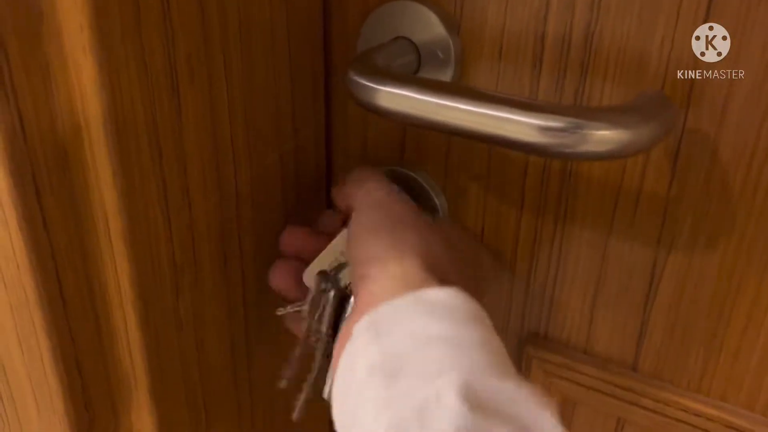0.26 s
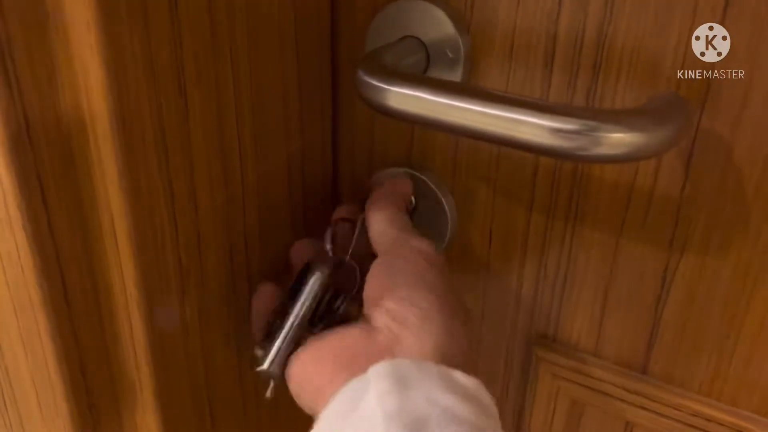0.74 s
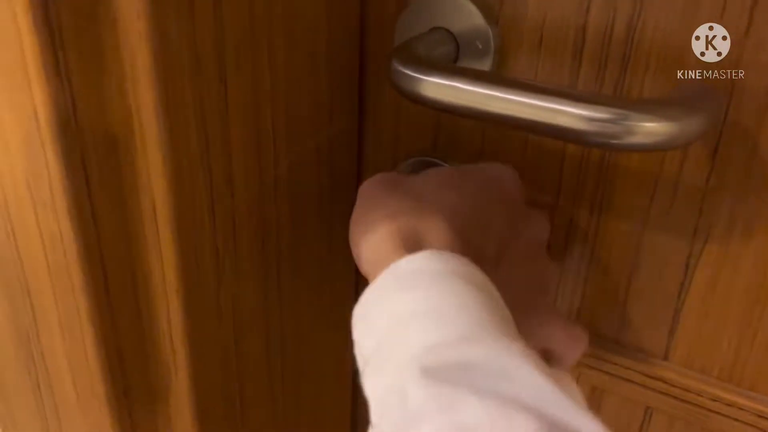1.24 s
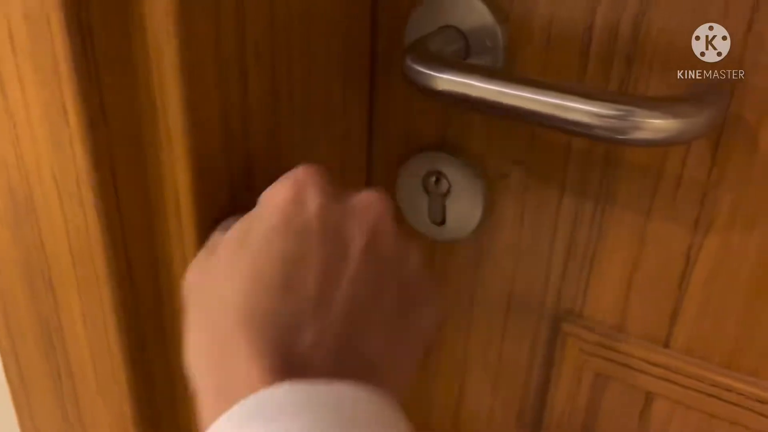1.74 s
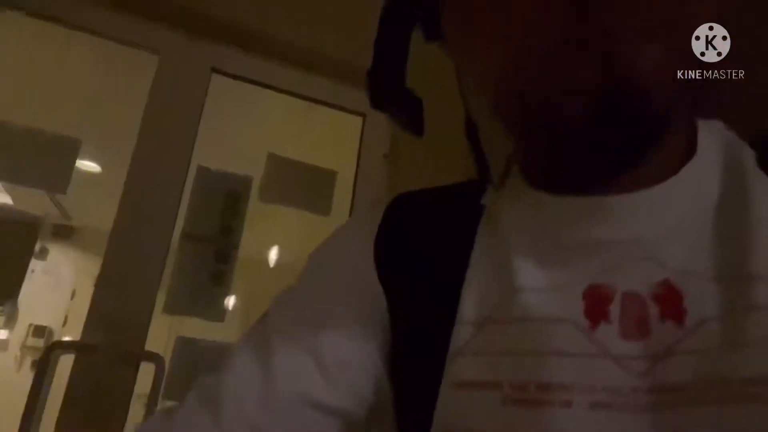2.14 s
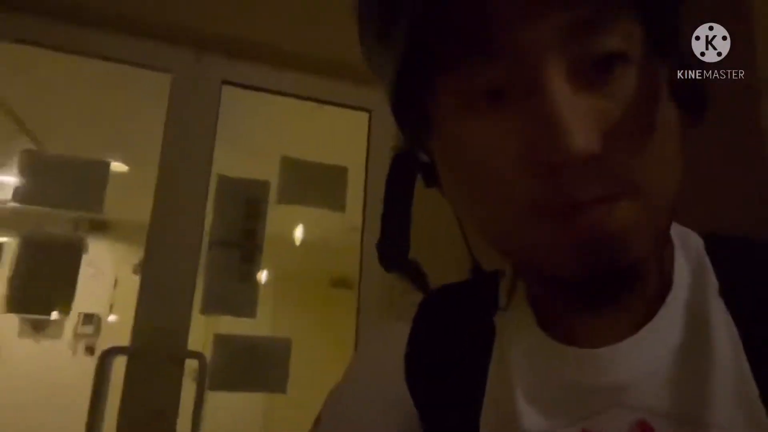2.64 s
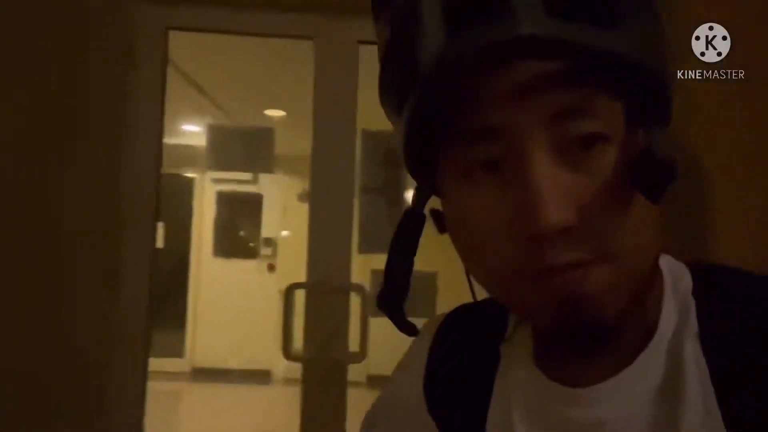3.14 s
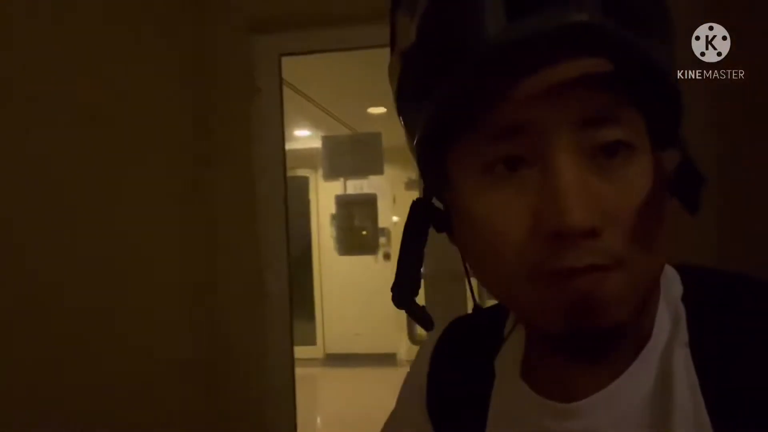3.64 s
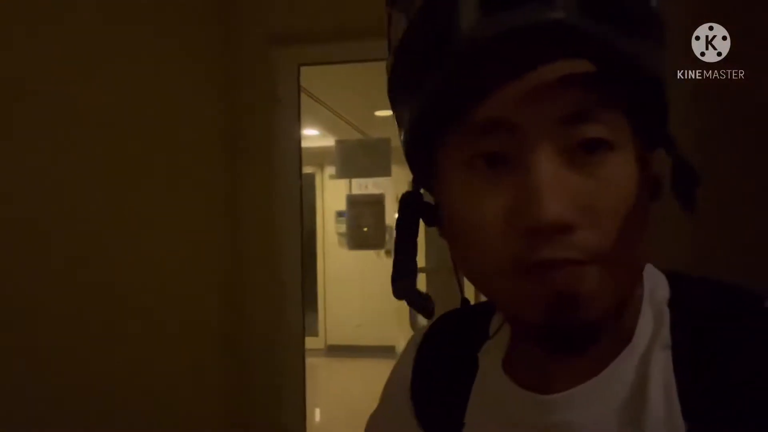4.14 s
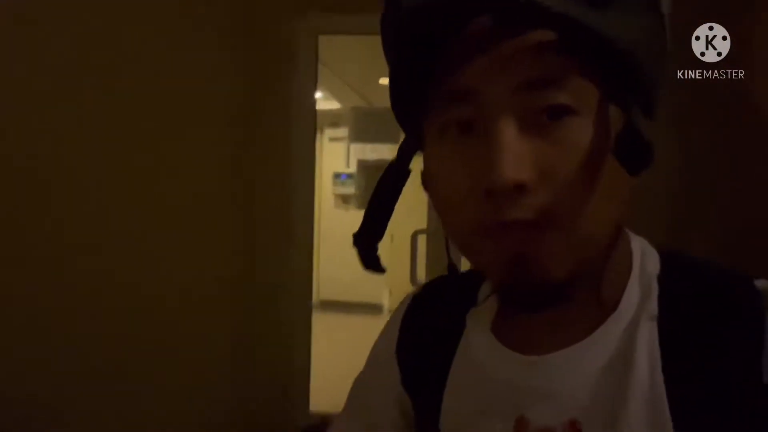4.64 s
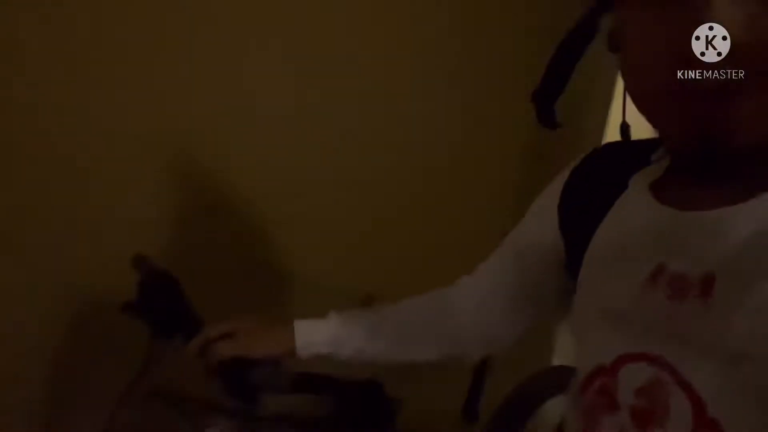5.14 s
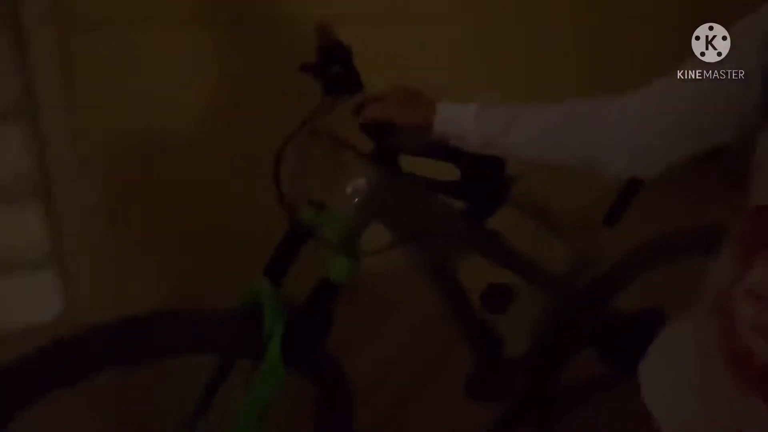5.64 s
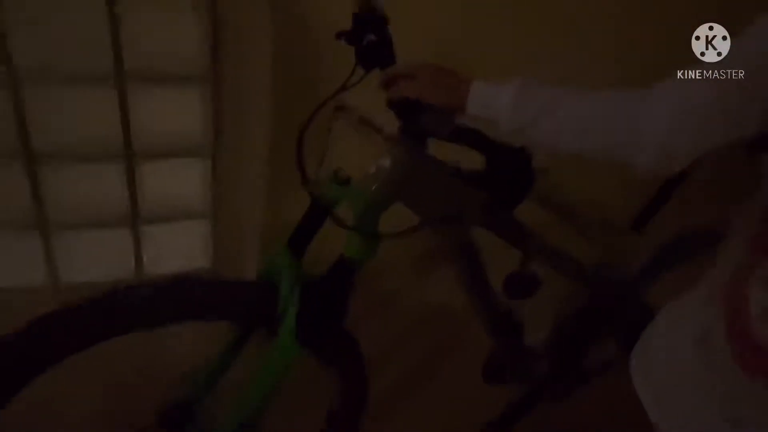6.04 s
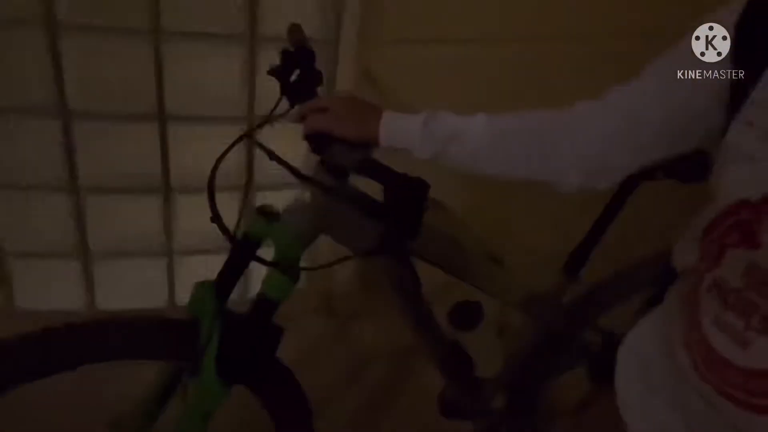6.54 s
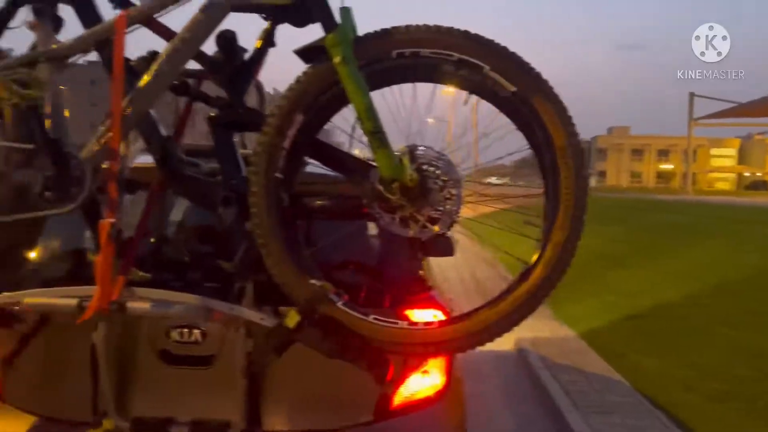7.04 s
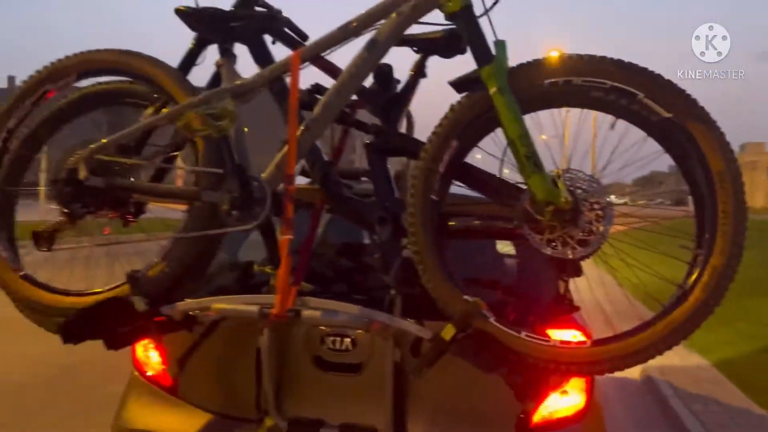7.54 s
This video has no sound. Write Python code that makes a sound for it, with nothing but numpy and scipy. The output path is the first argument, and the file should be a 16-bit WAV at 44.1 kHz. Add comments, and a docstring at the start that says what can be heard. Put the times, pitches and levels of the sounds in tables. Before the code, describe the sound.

Close by in a hard, echoing corridor, a bunch of keys jangles and scrapes while a lock snaps and clunks hard in a wooden door, which bumps and booms. After two seconds it fades into a humming lobby where a bicycle freewheel ticks slowly, then faster, with one soft frame bump. Finally, outdoors, a rack knocks in a quick burst beside a steady low car engine.

```python
"""A bunch of keys jangles as a lock is turned in an echoing corridor: noise snaps, bouncing grit and ringing tones.
The wooden door knocks, bumps and booms around them.
Next, a bicycle is wheeled through a humming lobby; its freewheel, three pawls a tooth, ticks mostly faster.
Last, outdoors, a car engine rumbles as sines locked to its crankshaft over noise, and a bicycle rack on the car
knocks in one quick burst. The three places follow each other with fades."""
import sys
import numpy as np
from scipy import signal
from scipy.fft import rfft, irfft, next_fast_len
from scipy.io import wavfile
from scipy.ndimage import uniform_filter1d, map_coordinates

SR = 44100
rng = np.random.default_rng(int(sys.argv[2]) if len(sys.argv) > 2 else 0)


def waveform_to_disk(signal):
    """Save audio, clipped to [-1, 1], as 16-bit WAV at the path in sys.argv[1]."""
    frames = np.transpose(np.atleast_2d(signal))
    scaled = np.clip(frames, -1, 1) * 32767
    samples = np.round(scaled).astype(np.int16)
    wavfile.write(sys.argv[1], SR, samples)


N = 343538
TIME = np.arange(N) / SR
EDGE_HZ = 16100  # top of the audible band here

# when the lobby is heard: (fade-in start [s], fade-in end [s], fade-out start [s], fade-out end [s])
LOBBY_TIMES = (2.11, 2.3, 6.72, 6.795)
# how alike noise is on the left and right: (frequency [Hz], coherence [0-1])
LIKENESS = [(30, 0.012), (70, 1), (130, 0.88), (260, 0.76), (520, 0.13), (1000, 0.16), (16000, 0.18)]
# tone colour of key metal striking and scraping: (frequency [Hz], relative level [dB])
KEY_METAL = [(500, -13.5), (1500, -14.5), (2600, -10.5), (4500, -3.5), (6500, -1.5), (8200, 0.5),
             (9400, -3), (10800, 3.5), (12500, -1), (14000, 3), (15500, 3.5), (16500, 5.5)]


def amp(db):
    """Turns decibels into a plain multiplier."""
    return 10 ** (np.asarray(db) / 20)


def unit(x):
    """Scales a sound to an average strength (rms) of 1."""
    return x / np.sqrt(np.mean(x ** 2) + 1e-20)


def read(points, hz):
    """Reads a table between its points, with frequency on a logarithmic scale."""
    f, value = np.transpose(points)
    return np.interp(np.log(hz + 1), np.log(f + 1), value)


def add(mix, s, sound):
    """Adds a sound to the mix, starting at s seconds."""
    part = mix[:, max(0, round(s * SR)):][:, :sound.shape[1]]
    part += sound[:, :part.shape[1]]


def dying(t, t60):
    """Exponential decay that falls by 60 dB in t60 seconds."""
    return np.exp(-np.log(1000) * t / t60)


def peak_unit(x, size=176):
    """Scales a hit so that its loudest 4 ms have rms 1."""
    return x / np.sqrt(uniform_filter1d((x ** 2).mean(0), size).max() + 1e-20)


def colour(x, gain_db, size=2048):
    """Filters without sounding ahead of time (minimum phase); gain_db(hz) gives the gain."""
    hz = abs(np.fft.fftfreq(size, 1 / SR))
    log_gain = np.log(amp(np.maximum(gain_db(hz), -100)))
    taps = np.fft.ifft(np.exp(np.conj(signal.hilbert(log_gain)))).real
    return signal.oaconvolve(x, taps[None], axes=1)[:, :x.shape[1]]


def spotty(hz, spot_db):
    """Chance gains in dB, spread evenly over frequency: no two spots on a surface sound the same."""
    return np.interp(hz, np.linspace(0, SR / 2, len(spot_db)), spot_db)


def pair(n):
    """White noise on the left and right: mostly alike around 70 to 260 Hz, mostly unrelated in the treble."""
    a, b = rfft(rng.standard_normal((2, n)))
    same = np.clip(read(LIKENESS, np.fft.rfftfreq(n, 1 / SR)), -1, 1)
    return irfft(np.array([a, same * a + np.sqrt(1 - same ** 2) * b]), n)


def wash(spectrum):
    """Steady noise from all around, shaped by a spectrum, of rms 1."""
    n = next_fast_len(N, True)
    gain = amp(read(spectrum, np.fft.rfftfreq(n, 1 / SR)))
    return unit(irfft(rfft(pair(n)) * gain, n)[:, :N])


def drift(count):
    """Smooth chance curve of rms 1, made from count random values over the whole duration."""
    curve = signal.resample(rng.standard_normal(count), count * 8)
    return unit(np.interp(TIME, np.linspace(0, TIME[-1], count * 8), curve))


def room(x, t60s, build_s, size=44100, ripple_db=0, count=700):
    """Echo tail that builds up, each band dying at its own speed; hard walls favour some pitches."""
    favoured = rng.standard_normal(count).clip(-2, 2)
    favoured = np.interp(np.linspace(0, count - 1, size // 2 + 1), np.arange(count), favoured)
    noise = irfft(rfft(pair(size)) * amp(ripple_db * favoured), size)
    hz, t, z = signal.stft(noise, SR, nperseg=256)
    tail = signal.istft(z * amp(-60 * t / read(t60s, hz)[:, None]), SR, nperseg=256)[1]
    tail = tail * (1 - np.exp(-np.arange(tail.shape[1]) / SR / build_s))
    return signal.fftconvolve(x, tail / np.linalg.norm(tail[0]), axes=1)[:, :N]


def roaming(x, depth_db, width_hz, last_s):
    """Room resonances come and go in a steady noise as the microphone moves among them."""
    even_out_hz = 2300  # higher up the resonances overlap and even out
    hz, t, z = signal.stft(x, SR, nperseg=4096)
    place = np.meshgrid(hz / width_hz, t / last_s, indexing="ij")
    patches = map_coordinates(rng.standard_normal(size=(256, 128)), place, order=1, mode="wrap")
    gain = amp(depth_db * unit(patches) / (1 + hz[:, None] / even_out_hz))
    return unit(signal.istft(z * gain, SR, nperseg=4096)[1][:, :N])


def knocks(rows, spectrum, modes, ring_db, crack_db=-10, crack_t60=.005, detune=0, grainy=0):
    """A blow is a crack and a short rattle in a body whose tones ring on; loose parts can shift their pitch."""
    out, t = np.zeros((2, N)), np.arange(SR * 2 // 3) / SR
    contact_samples = 32  # how long each grain of the rattle lasts
    mode_hz, mode_db, mode_t60 = np.transpose(modes)
    decays = amp(-60 * t / mode_t60[:, None])
    for s, db, t60, tilt_db in rows:
        def tilt(hz):
            return tilt_db * np.log2(np.maximum(hz, 130) / 1000)

        grains = np.repeat(rng.standard_normal(len(t)), contact_samples)[:len(t)]
        contacts = np.exp(grainy * grains.clip(-2, 2))
        force = contacts * dying(t, t60) + amp(crack_db) * dying(t, crack_t60)
        blow = peak_unit(colour(pair(len(t)) * force, lambda hz: read(spectrum, hz) + tilt(hz)))

        tuned_hz = mode_hz * (1 + detune * rng.standard_normal(len(modes)))
        swings = decays * np.exp(2j * np.pi * tuned_hz[:, None] * t)
        # tones that are less alike on the two sides start further out of step
        phase = rng.random(len(modes)) + rng.random((2, len(modes))) * (1 - read(LIKENESS, mode_hz)) / 2
        strengths = amp(mode_db + tilt(mode_hz)) * np.exp(2j * np.pi * phase)
        ring = peak_unit((strengths @ swings).imag)
        add(out, s, amp(db) * (blow + amp(ring_db) * ring))
    return out


def standing_wave():
    """Change of the lobby's low hum, in dB, along the microphone's way through its standing waves."""
    # swing of the hum before each sound takes its share: (time [s], level [dB])
    swing = [(2.3, 2), (2.85, -2.5), (3.15, -12.5), (3.8, -23.5), (5.7, -15), (6.2, -10), (6.7, -0.5)]
    return np.interp(TIME, *np.transpose(swing))


def ventilation_rumble():
    """Low ventilation noise, gently changed by the standing wave and by passing resonances."""
    # tone colour of the rumble: (frequency [Hz], relative level [dB])
    bass = [(13, -46), (22, -33), (40, -0.5), (60, 0.5), (114, -6.5), (125, -12.5), (136, -44),
            (161, -11.5), (194, -17), (217, -22.5), (233, -13.5), (250, -34), (320, -54), (550, -120)]
    level = amp(-37 + 0.19 * standing_wave())
    return level * roaming(wash(bass), depth_db=1.5, width_hz=21.84, last_s=.13)


def ventilation_rush():
    """Airy ventilation noise whose resonances come and go."""
    # tone colour of the rush: (frequency [Hz], relative level [dB])
    air = [(130, -0.5), (220, -1), (330, -3.5), (430, -2), (620, 0), (950, -10), (1400, -12.5), (2600, -14),
           (3600, -23), (6000, -27), (10000, -33), (16000, -35.5)]
    return amp(-45) * roaming(wash(air), depth_db=3, width_hz=45, last_s=.25)


def hum(waver=0.28, wander=0.11):
    """Fan tones swell and sink as the microphone moves through their standing waves."""
    # fan tones: (frequency [Hz], level before the swing [dB], share of the standing-wave swing [0-1])
    tones = [(59.3, -36, 0.58), (107.6, -46.5, 0.2), (211.7, -58, 0.03), (229, -59.5, 0.21),
             (425, -63.5, 0), (607, -67, 0), (614, -62.5, 0.05)]
    place_db, out = standing_wave(), 0
    for hz, db, share in tones:
        level = np.sqrt(2) * amp(db + share * place_db) * (1 + waver * drift(count=30))
        out = out + level * np.sin(2 * np.pi * (hz * TIME + wander * drift(count=40)))
    return out


def road_noise():
    """Steady outdoor road noise."""
    # tone colour of the street: (frequency [Hz], relative level [dB])
    road = [(70, -18.5), (140, -7.5), (210, -8), (330, -14), (470, -17), (620, -19.5), (920, -16.5),
            (1400, -25.5), (2000, -29.5), (4000, -33), (8000, -44), (12000, -46), (16000, -68.5)]
    return amp(-46) * wash(road)


def engine(uneven=0.11, jitter_turns=0.005):
    """A four-cylinder engine fires twice a turn, a little unevenly, over noisy exhaust flutter."""
    # engine speed and loudness: (time [s], crankshaft frequency [Hz], level [dB])
    running = [(7.0, 29.8, -25.5), (7.058, 29.77, -25), (7.7, 29.53, -27), (7.78, 31.6, -30)]
    # strength of 1 to 5 times the crankshaft frequency: (relative level [dB])
    orders_db = [-20, 2, -10.5, -17, -23.5]
    # tone colour of the exhaust: (frequency [Hz], relative level [dB])
    exhaust = [(20, -13), (35, 1), (80, 10), (115, 3), (170, -11.5), (300, -42.5)]
    s, hz, db = np.transpose(running)
    turns = np.cumsum(np.interp(TIME, s, hz)) / SR + jitter_turns * drift(count=300)
    tone = sum(amp(order_db) * np.sin(2 * np.pi * (k * turns + rng.random()))
               for k, order_db in enumerate(orders_db, 1))
    firing = amp(np.interp(TIME, s, db)) * unit(tone) * (1 + uneven * drift(count=400))
    return firing + amp(-41) * wash(exhaust)


def rack_knocks():
    """The bicycle rack on the car knocks in a burst of blows, its loose parts shifting pitch each time."""
    # blows: (time [s], level of the blow [dB], t60 [s], treble tilt [dB per octave])
    blows = [(6.99, -41.5, 0.1, 6), (7.032, -31.5, 0.05, 6), (7.039, -31.5, 0.038, 1),
             (7.045, -36, 0.11, -1.5), (7.055, -35, .06, -3), (7.069, -38, .05, -4.5),
             (7.081, -44, 0.042, -3.5), (7.095, -42.5, .03, -1.5)]
    # tone colour of a blow: (frequency [Hz], relative level [dB])
    body = [(100, -46), (200, -9), (520, -4), (750, 0.5), (930, 1), (1180, 3), (1420, -2.5), (1650, -4.5),
            (1950, -9), (2400, -7.5), (3000, -15), (4500, -17), (9000, -31), (15000, -37.5)]
    # ringing tones before detuning and tilt: (frequency [Hz], relative level [dB], t60 [s])
    modes = [(420, -4.5, 0.1), (767, -5.5, .11), (1150, 1.5, 0.11), (1200, -2, 0.13), (1307, -3, .1),
             (1620, -7, 0.11), (2200, -2, 0.044), (2480, -3.5, .03)]
    return knocks(blows, body, modes, ring_db=-3.5, crack_db=-3, detune=0.014, grainy=.2)


def street():
    """Engine, road noise and knocking rack outdoors."""
    return engine() + road_noise() + rack_knocks()


def bumps():
    """The bicycle frame bumps as it is steered."""
    # bumps: (time [s], level of the blow [dB], t60 [s], treble tilt [dB per octave])
    blows = [(6.44, -30.5, 0.066, 0)]
    # tone colour of the frame: (frequency [Hz], relative level [dB])
    frame = [(100, -8), (200, -4), (360, -10), (500, -19), (2000, -29.5), (12000, -58)]
    # ringing tones of the frame: (frequency [Hz], relative level [dB], t60 [s])
    modes = [(226, -4, .07), (327, 5, 0.064)]
    return knocks(blows, frame, modes, ring_db=-8.0)


def teeth():
    """One tick for each tooth that the wheel brings past: rows (time s, level dB, time to next tooth s)."""
    # freewheel speed as the bicycle is pushed: (time [s], speed [teeth per s])
    wheel_speed = [(2.293, 1.365), (2.559, 2.045), (3.004, 4.711), (3.462, 6.357), (4.373, 7.628),
                   (4.74, 10.63), (5.246, 10.051), (5.617, 10.417), (6.064, 13.919), (6.319, 13.562),
                   (6.72, 10.712)]
    s, speed = np.transpose(wheel_speed)
    t = np.arange(s[0], LOBBY_TIMES[-1], 1 / SR)
    passed = np.cumsum(np.interp(t, s, speed)) / SR
    starts = np.interp(np.arange(int(passed[-1]) + 1), passed, t)
    # from 5.3 s the hub moves away, losing 2.86 dB per second
    level_db = -29 - 2.86 * np.maximum(starts - 5.3, 0)
    return zip(starts, level_db, np.gradient(starts))


def freewheel(stagger=.022, slack=.3, patchy_db=2.0, broad_db=1.4, spiky=1.0, count=50):
    """Three pawls drop just after each other, closer at speed; floor and walls scatter each tick anew."""
    # tone colour of the hub: (frequency [Hz], relative level [dB])
    hub_metal = [(1000, -15), (2000, -16.5), (2650, -5.5), (3300, -12.5), (4200, -11), (4950, -6.5),
                 (5400, -10.5), (6000, -8.5), (6650, 0), (7600, -2), (8650, 3.5), (9800, -2.5), (11200, -5),
                 (14200, 4), (15500, -0.5), (16300, -11.5)]
    # decay of the lobby echo: (frequency [Hz], t60 [s])
    echo_t60 = [(1000, 0.35), (4000, 0.43), (8000, 0.36), (12000, 0.29), (16000, 0.16)]
    # how squarely the hub faces the microphone, which bares its snap: (time [s], level [dB])
    facing = [(2.3, -0.5), (3.2, -3), (3.7, 0), (4.5, -1.5), (5.0, -2.5), (6.7, 3.5)]
    # lift of the rim's resonance as the wheel turns away: (time [s], level [dB])
    rim_lift = [(2.3, 3.5), (3.2, 8), (4.6, 4), (4.8, -3.5), (6.7, 0)]
    # pawls in the order they drop: (relative level [dB])
    pawls_db = [-4.5, -1, -0.5]
    rim_middle_hz, rim_width_hz, rim_wander = 3130, 470, .075  # the rim rings under each tick
    dulling_db_per_s = 0.65  # loss at the top of the band as the hub turns aside
    out, t = np.zeros((2, N)), np.arange(SR // 6) / SR
    for s, db, period in teeth():
        facing_db = np.interp(s, *np.transpose(facing))
        near_echo = amp(-11 - facing_db) * dying(t, 0.15)
        scatter = (dying(t, 0.0038) + near_echo) * (1 - dying(t, 0.0037))
        # each tooth rings the hub differently, in fine and in broad patches
        broad = signal.resample(rng.standard_normal(count // 5), count)
        tooth_db = patchy_db * rng.standard_normal(count) + broad_db * broad
        rim_db = np.interp(s, *np.transpose(rim_lift))
        rim_hz = rim_middle_hz * np.exp(rim_wander * rng.standard_normal())

        def hub(hz):
            dulling = dulling_db_per_s * (s - LOBBY_TIMES[1]) * (hz / EDGE_HZ) ** 2
            rim = rim_db / (1 + (2 * (hz - rim_hz) / rim_width_hz) ** 2)
            return read(hub_metal, hz) - dulling + rim + spotty(hz, tooth_db)

        tick = np.zeros((2, SR // 5))
        for pawl, pawl_db in enumerate(pawls_db):
            # early paths are few and strong
            spikes = np.exp(spiky * dying(t, 0.15) * rng.standard_normal(len(t)))
            paths = rng.standard_normal((2, len(t))) * spikes
            delay = stagger * period * max(pawl + slack * rng.uniform(-1, 1), 0)
            level = amp(db + 0.45 * facing_db + pawl_db + rng.uniform(-0.14, 0.15))
            add(tick, delay, level * peak_unit(colour(paths * scatter, hub)))
        add(out, s, tick)
        add(out, s + 0.022, amp(-12.5) * tick[::-1])  # the nearest wall throws it back, sides swapped
        add(out, s, amp(-4.5) * room(tick, echo_t60, build_s=0.0028, size=22050))
    return out


def lobby():
    """Ventilation and fans behind the ticking, bumping bicycle."""
    return ventilation_rumble() + hum() + ventilation_rush() + bumps() + freewheel()


def corridor_air():
    """Steady background noise of the corridor."""
    # tone colour of the air: (frequency [Hz], relative level [dB])
    air = [(15, -53), (25, -35.5), (38, -4.5), (70, -9.5), (101, 1), (130, -14.5), (206, -13.5),
           (253, -22.5), (284, -17), (374, -23), (1700, -37.5), (2340, -34.5), (6000, -33.5), (7800, -37.5),
           (13200, -120)]
    return amp(-42.5) * wash(air)


def brushes():
    """Knuckles brush the door."""
    # touches: (time [s], level of the blow [dB], t60 [s], treble tilt [dB per octave])
    touches = [(.327, -39, 0.086, -2.5), (.344, -44, 0.035, -1.5), (1.432, -40.5, 0.12, 5.5)]
    # tone colour of a touch: (frequency [Hz], relative level [dB])
    knuckle = [(120, -20), (270, -3), (450, -2.5), (620, -19.5), (1500, -31), (8000, -52.5)]
    # ringing tone under a touch: (frequency [Hz], relative level [dB], t60 [s])
    modes = [(334, 0, 0.051)]
    return knocks(touches, knuckle, modes, ring_db=-22.5)


def thuds():
    """The door leaf bumps in its frame; each low boom sinks in pitch as the pull on the door lets go."""
    # bumps: (time [s], level of the blow [dB], t60 [s], treble tilt [dB per octave],
    #         starting boom frequency [Hz], boom level [dB])
    door_bumps = [(.757, -36, 0.093, 2, 163, -45), (1.634, -32.5, 0.068, 3, 420, -41.5),
                  (1.642, -35, 0.14, -1, 146, -33.5), (1.657, -30, 0.11, 0.5, 260, -35),
                  (1.686, -37, 0.42, -6.5, 105, -36), (1.702, -37, 0.12, -5, 190, -37),
                  (1.728, -42, 0.063, 2.5, 415, -46), (1.762, -41.5, 0.45, -9, 100, -35),
                  (1.834, -41.5, .15, -12, 170, -45)]
    # tone colour of the leaf: (frequency [Hz], relative level [dB])
    panel = [(35, -6), (60, 12), (130, -2), (200, 1.5), (380, -10), (480, -12), (1000, -19.5),
             (3000, -29.5), (12000, -58.5)]
    # ringing tones of the leaf before tilt: (frequency [Hz], relative level [dB], t60 [s])
    modes = [(145.5, 15, 0.58), (207.6, 0.5, 0.5), (297, -15, 0.11), (373, -9.5, 0.11)]
    sag, sag_s, rise_s, boom_t60 = 0.3, .05, 0.0041, 0.065  # pitch sinks towards 30 % lower
    out = knocks([row[:4] for row in door_bumps], panel, modes, ring_db=-10.5)
    t = np.arange(SR // 4) / SR
    for s, *_, hz, db in door_bumps:
        turns = np.cumsum(hz * (1 - sag * (1 - np.exp(-t / sag_s)))) / SR
        boom = np.sin(2 * np.pi * turns) * (1 - np.exp(-t / rise_s)) * dying(t, boom_t60)
        add(out, s, amp(db) * peak_unit(boom[None]))
    return out


def lock_knocks():
    """The lock and bolt knock in the wooden door, which rings on."""
    # blows: (time [s], level of the blow [dB], t60 [s], treble tilt [dB per octave])
    blows = [(.151, -42, 0.63, 2), (.228, -40.5, 0.13, 0), (.560, -31, 0.054, 5),
             (.725, -47.5, 0.072, -5.5), (.751, -42, .03, 4), (.758, -37.5, 0.13, -1.5),
             (.7925, -38.5, 0.021, 5), (.7965, -34.5, .012, 7.5), (.853, -37.5, 0.31, -1.5),
             (.8705, -29, 0.096, -4), (.888, -28, 0.052, 5), (.8945, -17, 0.049, -3),
             (.899, -18.5, 0.016, 1), (.902, -23.5, 0.1, -2.5), (.909, -23, 0.06, 1),
             (.922, -33, 0.056, -6.5), (1.619, -36, .02, 4), (1.635, -29, 0.08, 2.5), (1.657, -37, 0.1, 2),
             (1.68, -40, .06, 5)]
    # tone colour of the door: (frequency [Hz], relative level [dB])
    door = [(60, -25), (150, -5.5), (230, -7), (380, -2.5), (520, -4), (720, -3), (1050, 4), (1500, -1.5),
            (2200, 0), (3200, -4.5), (5500, -7), (8000, -10.5), (12000, -15.5), (16000, -24.5)]
    # ringing tones of the door before tilt: (frequency [Hz], relative level [dB], t60 [s])
    modes = [(149.5, -2.5, 1), (356.5, 7, .2), (600, -6.5, 0.31), (804, -14.5, 0.47), (880, -11, .6),
             (995, -15.5, 0.36), (1126, -10.5, 0.26), (1280, -7.5, 0.65), (1400, -8, 0.22),
             (1484, -10.5, 0.3), (1920, -8.5, 0.23), (2140, -3.5, .25)]
    return knocks(blows, door, modes, ring_db=-18.5, crack_db=-2.5, grainy=.3)


def slides(width_hz=260, slips_per_s=550):
    """The key blade slides in its barrel: quick uneven slips excite one broad resonance."""
    # slides: (start [s], end [s], level before its soft ends [dB], squeak frequency [Hz])
    strokes = [(0.151, 0.224, -45, 4210), (0.294, 0.401, -47.5, 3570), (0.459, 0.526, -49.5, 3470),
               (0.709, 0.74, -55, 1850), (0.751, 0.778, -40, 2363), (1.436, 1.465, -49.5, 2300),
               (1.95, 1.974, -52, 2980)]
    out = np.zeros((2, N))
    for start, end, db, centre in strokes:
        t = np.arange(max(round((end - start) * SR), 500)) / SR
        slips = rng.exponential(1, len(t)) * (rng.random(len(t)) < slips_per_s / SR)
        slips = signal.oaconvolve(slips, dying(t, 0.025))[:len(t)]

        def squeak(hz):
            return -10 * np.log10(1 + (2 * (hz - centre) / width_hz) ** 2)

        rub = colour(slips * rng.standard_normal((2, len(t))), squeak)
        add(out, start, amp(db) * unit(rub) * signal.windows.tukey(len(t), .5))
    return out


def catches(count=40, patchy_db=2):
    """The key catches on the barrel's pins; damped by the fingers, it snaps without ringing on."""
    # snaps: (time [s], level [dB], t60 [s])
    snaps = [(0.205, -23, 0.015), (0.2117, -11.5, .04), (.255, -36, .01), (0.548, -17.5, .007),
             (0.5587, -10, 0.008), (.602, -39.5, .015), (.8525, -36.5, .008), (.903, -19.5, .016),
             (1.198, -32, .014), (1.494, -35, .012), (1.634, -18, 0.011), (1.681, -23.5, .012),
             (1.717, -33, 0.015)]
    # tone colour of the blade: (frequency [Hz], relative level [dB])
    blade = [(500, -38.5), (2200, -24), (5000, -24), (8000, -19.5), (9500, -11), (10400, 8.5), (11500, -3),
             (13500, -5), (16000, -3)]
    out, t = np.zeros((2, N)), np.arange(SR // 10) / SR
    for s, db, t60 in snaps:
        spot_db = patchy_db * rng.standard_normal(count)
        burst = rng.standard_normal((2, len(t))) * dying(t, t60)
        snap = colour(burst, lambda hz: read(blade, hz) + spotty(hz, spot_db))
        add(out, s, amp(db) * peak_unit(snap))
    return out


def key_ring(t, spread_db=5.5, detune=.006, damping=0.25, rattle_hz=12):
    """One blow rings the key tones with chance strengths; keys rattling on each other blur each tone."""
    # typical ringing tones, varied at each blow: (frequency [Hz], relative level [dB], t60 [s])
    modes = [(2300, -11, 0.055), (3470, -17, .09), (6100, -16, 0.16), (6580, -9.5, 0.14),
             (7770, -12.5, 0.14), (7720, -10, 0.2), (9560, 1, 0.078), (10370, 1, 0.13), (11000, -7.5, .06),
             (12200, -7, .09), (13600, -3, .12), (14980, 0.5, .1), (15400, 4.5, .1)]
    hz, db, t60 = np.transpose(modes)[:, :, None]
    size, tune, grip = rng.standard_normal((3, len(hz), 1))
    steps = rng.standard_normal((len(hz), len(t)))
    blur = np.cumsum(steps, 1) * np.sqrt(2 * np.pi * rattle_hz / SR)  # phase wanders at random
    strength = amp(db + spread_db * size - 60 * t / (t60 * np.exp(damping * grip)))
    swing = strength * np.exp(2j * np.pi * hz * (1 + detune * tune) * t + 1j * blur)
    start_phases = np.exp(2j * np.pi * rng.random((2, len(hz))))
    return peak_unit((start_phases @ swing).imag)


def chatter(t, t60, bounces_per_s=1500, low_hz=5500, ping_t60=.028, ping_db=-4, count=20):
    """Metal bounces on metal: grit, plus a ping of short tones chosen anew for each contact."""
    hz, short = rng.uniform(low_hz, EDGE_HZ, (count, 1)), t[:len(t) // 4]
    start_phases = np.exp(2j * np.pi * rng.random((2, count)))
    ping = (start_phases @ np.exp(2j * np.pi * hz * short)).imag * dying(short, ping_t60)
    bounces = rng.exponential(1, len(t)) * (rng.random(len(t)) < bounces_per_s / SR) * dying(t, t60)
    bounces[0] = 1
    grit = signal.oaconvolve(bounces, dying(short, 0.012))[:len(t)] * rng.standard_normal((2, len(t)))
    pings = signal.oaconvolve(bounces[None], ping, axes=1)[:, :len(t)]
    return peak_unit(peak_unit(grit) + amp(ping_db) * peak_unit(pings))


def agitation():
    """Each swing of the hand sets the bunch moving quickly, keeps it going, and lets it settle."""
    # swings of the hand: (start [s], length [s], added level [dB])
    shakes = [(0.061, 0.13, -40.5), (0.16, 0.1, -44.5), (0.31, 0.084, -42), (0.522, 0.025, -39.5),
              (0.618, 0.026, -38), (0.752, .02, -42), (0.867, 0.024, -35), (1.16, 0.085, -48),
              (1.308, 0.24, -43), (1.654, 0.052, -32.5), (1.718, 0.14, -39.5)]
    rise_s, settle_t60 = 0.017, 0.07
    moving = amp(-53.5)  # a held bunch never quite rests
    for s, length, db in shakes:
        rise = np.clip((TIME - s) / rise_s, 0, 1)
        moving = moving + amp(db) * rise * dying(np.maximum(TIME - s - length, 0), settle_t60)
    return moving


def jangle(per_s=330, spread_db=3.5, scrape_db=-2.5, ring_db=-2.0, count=10):
    """Many tiny contacts scrape as the bunch shifts, each ringing one of the keys."""
    sizes = amp(spread_db * np.minimum(rng.exponential(1, N), 3)) * (rng.random(N) < per_s / SR)
    key, t = rng.integers(0, count, N), np.arange(SR // 5) / SR
    ring = 0
    for k in range(count):
        hits = (sizes * (key == k))[None]
        ring = ring + signal.oaconvolve(hits, key_ring(t), axes=1)[:, :N]
    grit = signal.oaconvolve(sizes, dying(t, 0.023))[:N] * rng.standard_normal((2, N))
    scrape = colour(grit, lambda hz: read(KEY_METAL, hz))
    return agitation() * (amp(ring_db) * unit(ring) + amp(scrape_db) * unit(scrape))


def clinks(usual_body_db=-15, patchy_db=6.0, firm_db=-20, count=40):
    """Keys strike each other and the lock plate: a snap, a metal chatter coloured by the spot, and a ring."""
    # contacts: (time [s], relative level [dB], middle band against treble [dB])
    contacts = [(0.001, -30, -18.5), (0.0784, -31, -25), (0.098, -29.5, -5), (0.151, -24.5, -4),
                (0.1544, -20, -24.5), (0.1633, -25.5, -29.5), (0.178, -26, -14.5), (0.185, -26.5, -17.5),
                (0.2135, -23.5, -25), (0.2767, -28, -8), (0.301, -19, -16), (0.306, -27.5, -11.5),
                (.317, -28.5, -29), (.338, -30, -26.5), (0.36, -28, -25), (0.503, -34.5, -29.5),
                (0.533, -32, -27.5), (0.5624, -28, -25.5), (.632, -26.5, -34), (0.66, -32.5, -22.5),
                (.686, -45.5, -26.5), (0.7423, -30.5, -24), (.756, -28, -13), (0.7711, -23, -25.5),
                (0.784, -27, -19.5), (0.817, -27, -19), (0.871, -26, -15), (0.878, -28.5, -22),
                (.89, -18, -7), (1.07, -39.5, -1.5), (1.146, -34.5, -6), (1.1833, -30, -7.5),
                (1.199, -27.5, -4.5), (1.268, -34.5, -14), (1.291, -31.5, -7), (1.3456, -29, -12),
                (1.3544, -29.5, -12.5), (1.422, -34, -12), (1.451, -32, -16), (1.493, -27.5, -20.5),
                (1.522, -26, -25), (1.565, -32, -16), (1.634, -22.5, -24.5), (1.654, -23.5, -14),
                (1.665, -21, -22.5), (1.678, -19.5, -29), (1.718, -28, -8.5), (1.744, -31.5, -5.5),
                (1.8, -35, -2), (1.813, -31.5, -20), (1.922, -37.5, -6.5), (1.957, -38, 1.5)]
    out, t = np.zeros((2, N)), np.arange(SR // 4) / SR
    for s, db, body_db in contacts:
        body = body_db - usual_body_db
        spot_db = patchy_db * rng.standard_normal(count)
        t60 = 0.061 * 2 ** (body / 43)  # the more of the lock's body takes part, the longer it lasts
        ring_db = -7.5 - 0.88 * max(db - firm_db, 0)  # keys pressed firmly ring less
        snap_db = -2 + 0.86 * (db - firm_db)  # harder contacts snap more
        snap = amp(snap_db) * peak_unit(rng.standard_normal((2, len(t))) * dying(t, 0.01))

        def metal(hz):
            return read(KEY_METAL, hz) + body / (1 + (hz / 5500) ** 4) + spotty(hz, spot_db)

        strike = peak_unit(colour(snap + chatter(t, t60), metal))
        add(out, s, amp(db) * (strike + amp(ring_db) * key_ring(t)))
    return out


def corridor():
    """Keys, lock and door close by, the hard corridor answering."""
    # decay of the corridor echo: (frequency [Hz], t60 [s])
    echo_t60 = [(150, 1.3), (500, 2.87), (1500, 1.8), (4000, 1.3), (8000, 1.17), (15000, 0.29)]
    keys = amp(-1) * clinks() + jangle() + slides()
    lock = lock_knocks()
    leaf = thuds()
    into_room = amp(-14) * keys + amp(-8) * lock + amp(-7) * leaf
    echo = room(into_room, echo_t60, build_s=0.0012, ripple_db=1.4)
    return corridor_air() + echo + brushes() + leaf + lock + catches() + keys


def fade(times, curve):
    """Fades a place in and out; a higher curve keeps the ends of the fades quieter."""
    return np.interp(TIME, np.sort(times), [0, 1, 1, 0]) ** curve


def ports(x, table, bass_hz=450):
    """In the treble the two microphone ports partly share a sound, shifted in phase; bass stays as it was."""
    n, columns = next_fast_len(N + 2000, True), np.array(table)
    hz = np.fft.rfftfreq(n, 1 / SR)
    treble = hz ** 2 / (hz ** 2 + bass_hz ** 2)
    share, lead, balance_db = (read(columns[:, [0, k]], hz) * treble for k in (1, 2, 3))
    share = np.clip(share, 0, 1)
    left, right = rfft(x, n)
    right = (share * left + np.sqrt(1 - share ** 2) * right) * np.exp(-1j * lead)
    return irfft(np.array([left * amp(balance_db / 2), right * amp(-balance_db / 2)]), n)[:, :N]


def scene():
    """Corridor, lobby and street in turn, each heard through ports facing away from or towards the rider."""
    # when each is heard: (fade-in start [s], fade-in end [s], fade-out start [s], fade-out end [s])
    corridor_times = (-.02, -.01, 1.95, 2.1)
    street_times = (6.85, 7.0, 7.8, 7.9)
    # ports facing away from and towards the rider, before the easing-off in the bass:
    # (frequency [Hz], shared share [0-1], left lead [rad], left-right level [dB])
    rear_ports = [(400, 1, -1.5, -1.5), (1090, 0, 0.5, -1.5), (2400, 0.5, -2, 1.5), (4330, 0, -1.5, -2.5),
                  (6000, 0.25, 2, -4.5), (6900, 0.8, 0.5, -1), (8500, 0.7, 0, 1), (7830, 0.97, 0.5, -0.5),
                  (10800, 1, 5, 0), (13000, 0.9, 7.5, -0.5), (14700, 0.96, 11, -0.5), (15900, 1, 6.5, 2)]
    front_ports = [(426, 0, 0.5, 3.5), (2100, 0, 2, -3.5), (4950, 0, -2, 0), (7400, 0.68, -2, -3.5),
                   (9160, 0.93, -1.7, 0), (11900, 0.52, -1.5, -0.5), (14230, 0.89, -1.5, 0.5),
                   (16000, 0.54, 8.5, 0)]
    rear = street() * fade(street_times, curve=1.3) + corridor() * fade(corridor_times, curve=1.04)
    front = lobby() * fade(LOBBY_TIMES, curve=1.21)
    return ports(rear, rear_ports) + ports(front, front_ports)


def record(dry):
    """Removes what lies above the top of the band with a steep low-pass filter."""
    taps = signal.firwin(255, EDGE_HZ, window=("kaiser", 9), fs=SR)
    return signal.oaconvolve(dry, taps[None], "same")


dry = scene()
out = record(dry)
waveform_to_disk(out)
```